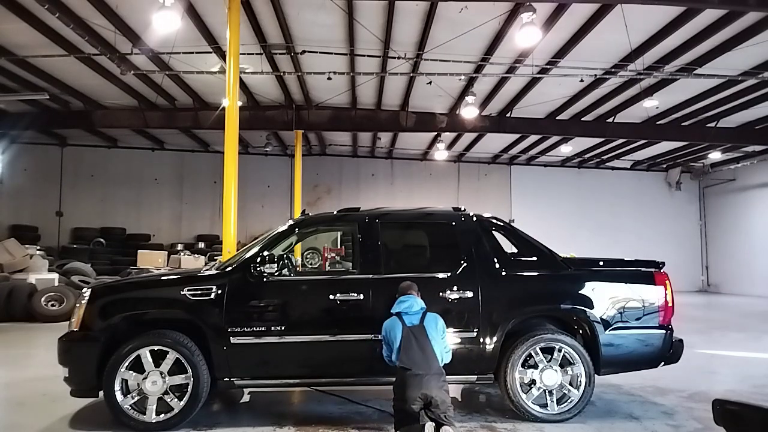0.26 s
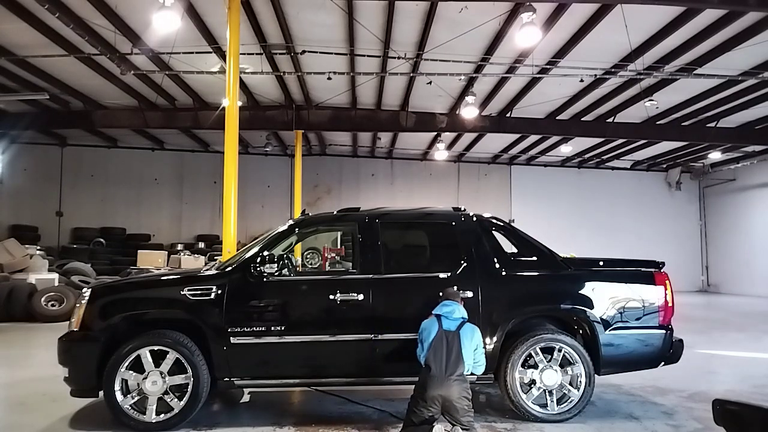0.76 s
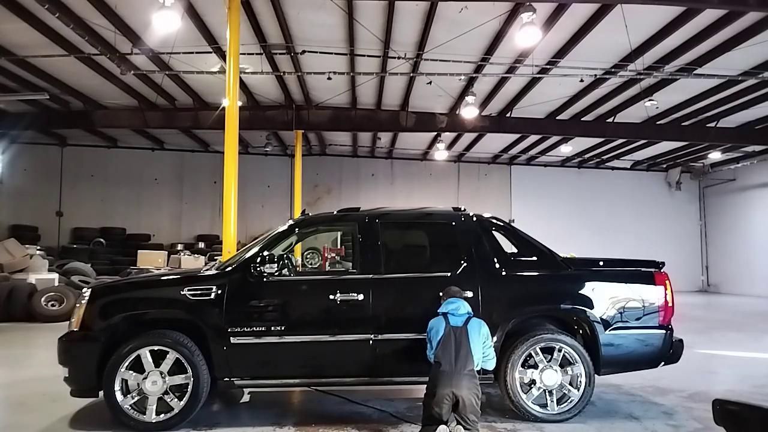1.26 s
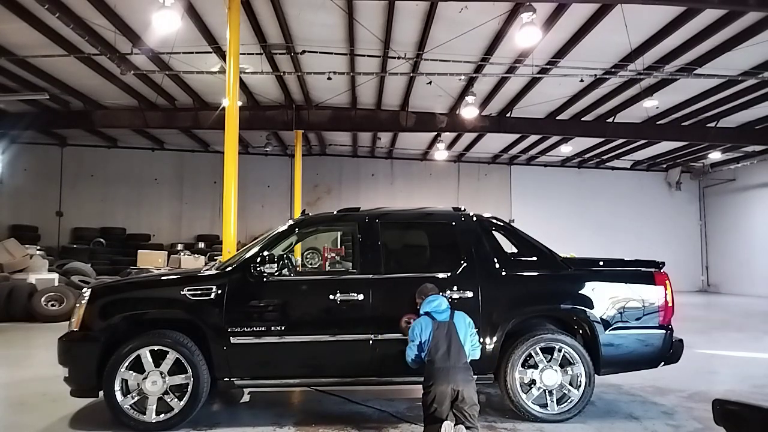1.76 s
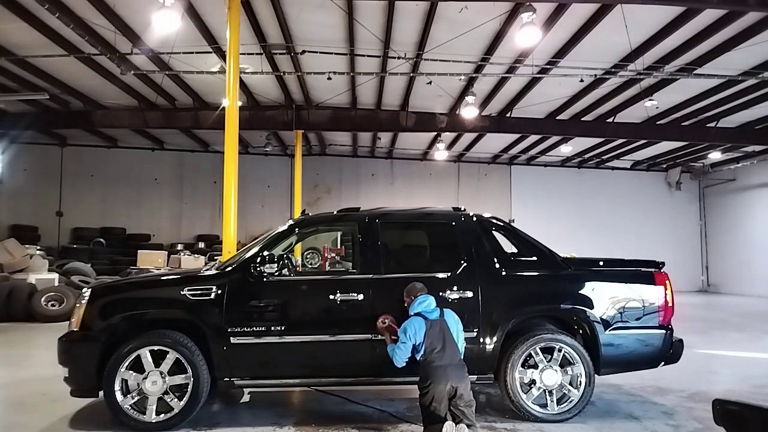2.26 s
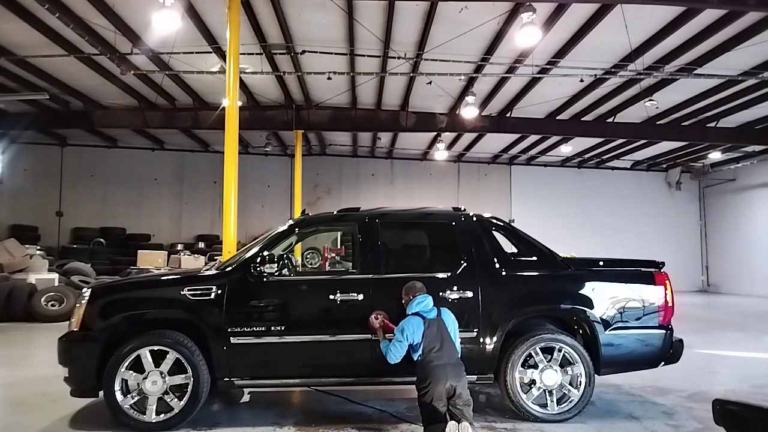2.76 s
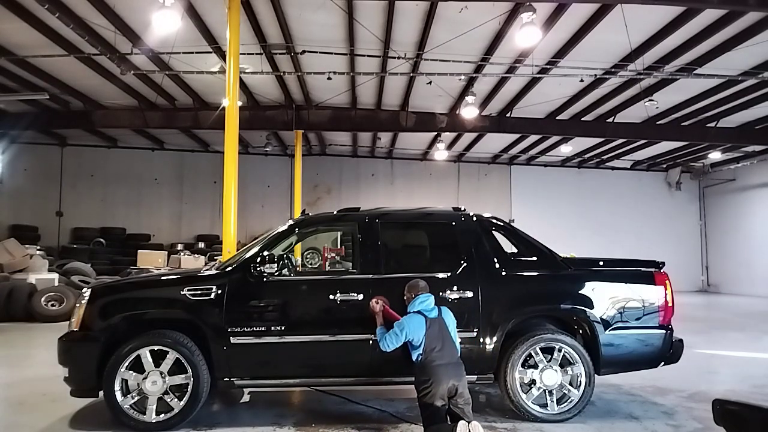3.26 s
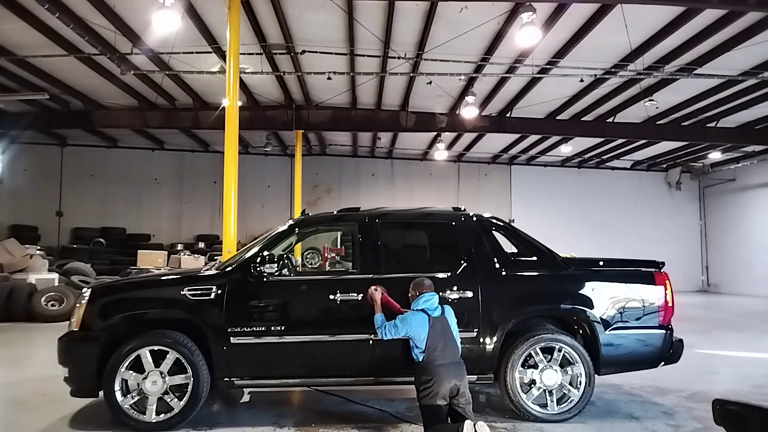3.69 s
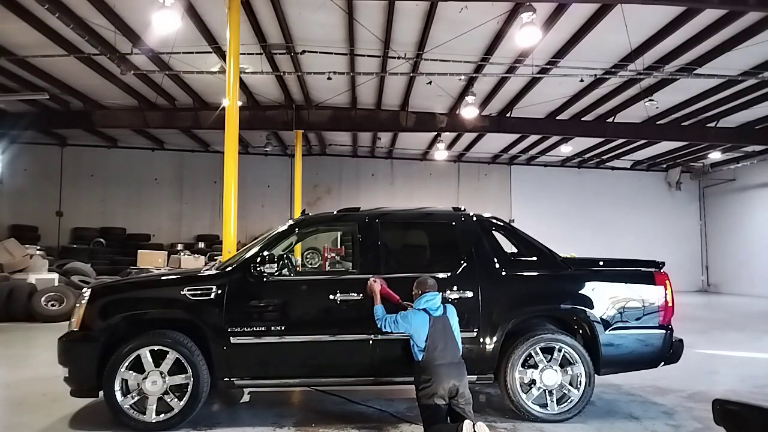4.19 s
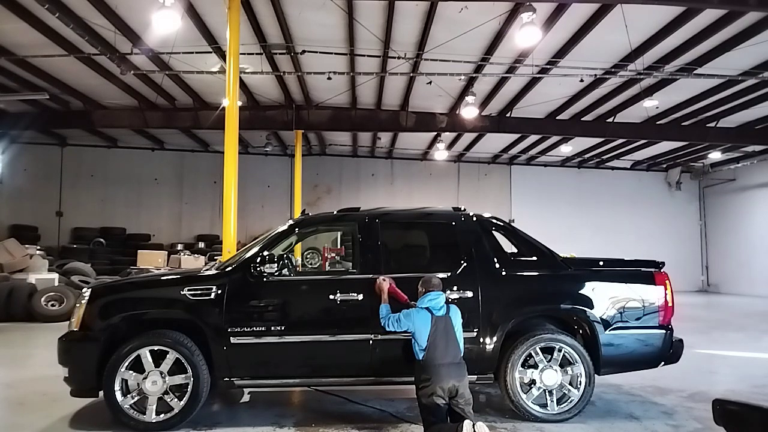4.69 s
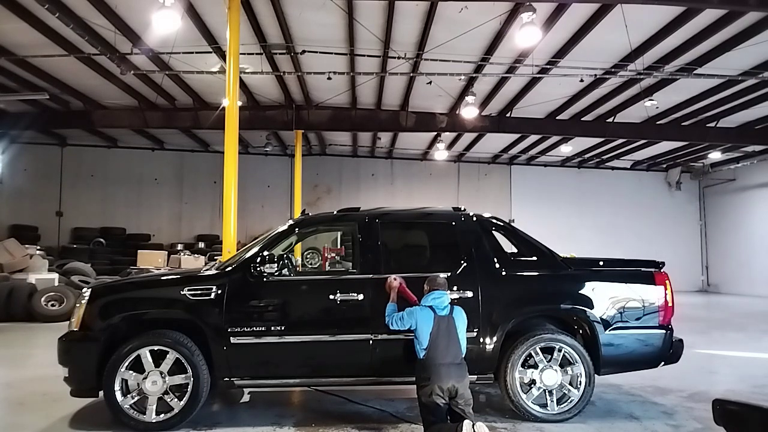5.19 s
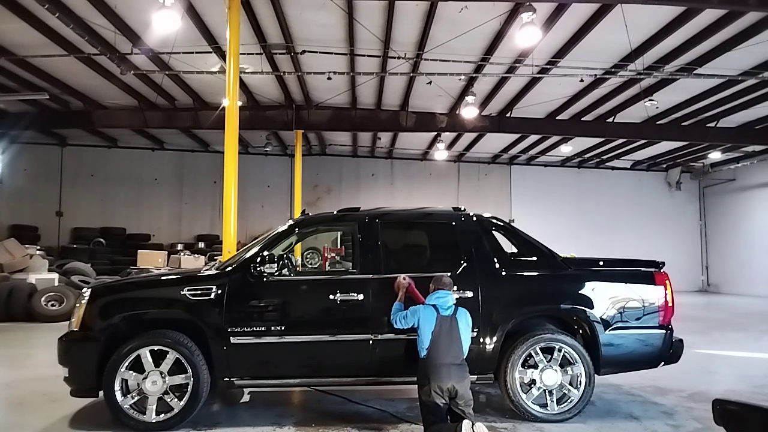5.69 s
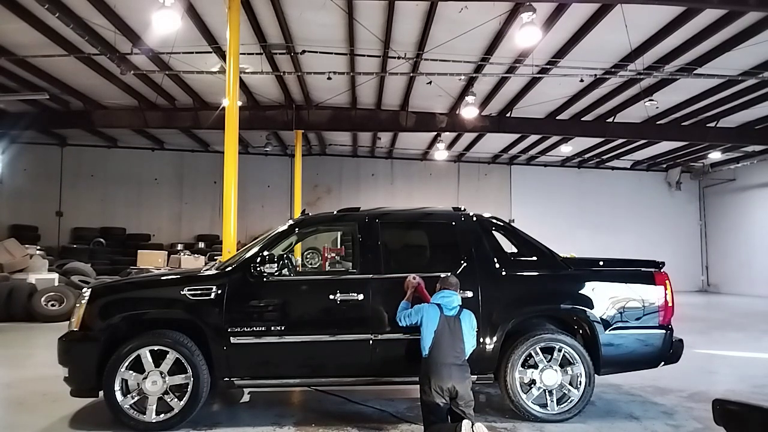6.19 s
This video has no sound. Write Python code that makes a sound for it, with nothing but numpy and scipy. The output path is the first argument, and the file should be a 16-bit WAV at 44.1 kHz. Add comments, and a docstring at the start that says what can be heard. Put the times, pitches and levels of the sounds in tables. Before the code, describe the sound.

An electric polisher whines piercingly and hisses against a car door in a large bare workshop, over a low fluttering hum and roar.

```python
"""An orbital polisher on a car door, some metres off in a large bare workshop, heard by two microphones.
Its motor whines through a seven-tooth pinion and sags when the pad is pressed: sines locked to one shaft angle.
Cooling air and pad hiss are shaped noise pulsed by the mains; the orbit throbs and rubs in the door panel.
A ringing noise tail smears the whine, and a fluttering hum near 100 Hz over a low roar fills the building."""
import sys
import numpy as np
from scipy import signal
from scipy.fft import rfft, irfft
from scipy.io import wavfile
from scipy.ndimage import uniform_filter1d, minimum_filter1d, map_coordinates

SR = 44100
rng = np.random.default_rng(int(sys.argv[2]) if len(sys.argv) > 2 else 0)


def dump_mix(stems):
    """Bounce the given channels to the path in sys.argv[1] as a 16-bit WAV at rate SR."""
    frames = np.atleast_2d(stems).T  # one column per channel
    limited = np.clip(frames, -1, 1)  # hard clip at full scale
    pcm = np.round(limited * 32767).astype(np.int16)
    wavfile.write(sys.argv[1], SR, pcm)


N = 284445
TIME = np.arange(N) / SR
BINS_HZ = np.arange(N // 2 + 1) * SR / N
PINION_TEETH, CROWN_TEETH = 7, 41
MAINS_HZ = 60
HALL_T60_S = 0.7
LEFT_RIGHT = np.array([[1], [-1]])


def undb(db):
    """Decibels to gain."""
    return 10 ** (np.asarray(db) / 20)


def unit(x):
    """Scale to rms 1."""
    return x / np.sqrt(np.mean(x ** 2, axis=-1, keepdims=True))


def curves(table):
    """The columns of a table, joined by straight lines in time."""
    s, *columns = np.transpose(table)
    return np.array([np.interp(TIME, s, c) for c in columns])


def spectra(table):
    """The columns of a table, joined by straight lines over log frequency."""
    hz, *columns = np.transpose(table)
    return np.array([np.interp(np.log(BINS_HZ + 1), np.log(hz), c) for c in columns])


def random_phase():
    """A starting angle anywhere in the cycle."""
    return rng.uniform(0, 2 * np.pi)


def walk(rate, count=4096):
    """Slow chance of spread 1, changing about rate times a second."""
    real, imaginary = rng.standard_normal((2, count))
    spectrum = (real + 1j * imaginary) * np.exp(-(BINS_HZ[:count] / rate) ** 2)
    slow = irfft(spectrum, 4 * count)
    return np.interp(TIME, np.linspace(0, TIME[-1], len(slow)), unit(slow))


# likeness of the two microphones' noise: (f/Hz, correlation)
MICROPHONE_LIKENESS = [(50, 1), (105, 0.95), (200, 0.82), (380, 0.83), (700, 0.56), (1300, 0.068),
                       (2400, 0.55), (4400, 0), (8000, 0)]


def noise(db_per_hz):
    """Stereo noise of a given spectrum; the microphones agree in the bass and part in the treble."""
    alike = spectra(MICROPHONE_LIKENESS)[0]
    mid, side = rfft(rng.standard_normal((2, N)))
    pair = mid * np.sqrt(1 + alike) + LEFT_RIGHT * side * np.sqrt(1 - alike)
    return irfft(pair * undb(db_per_hz) * np.sqrt(SR) / 2, N)


def hall(x, wet_db):
    """Direct sound plus the already ringing hall; a gliding tone swells and fades differently at each microphone."""
    decay = np.exp(-np.log(1000) * TIME / HALL_T60_S)
    tail = unit(rng.standard_normal((2, N)) * decay) / np.sqrt(N)
    wet = undb(wet_db)
    ringing = irfft(rfft(x) * rfft(tail), N)  # wraps round, so the hall rings from the start
    return (x + wet * ringing) / np.sqrt(1 + wet ** 2)


def fading(depth_db=1.3, wander_db=2.8, rate_per_s=9.0):
    """Moving through the hall's standing waves, a tone fades and drifts left to right; mean power 1."""
    sides = undb(LEFT_RIGHT * wander_db * walk(rate_per_s))
    sides = sides / np.sqrt(np.mean(sides ** 2, axis=0))
    return sides * unit(undb(depth_db * walk(rate_per_s)))


def beam(phase, level, lean_db):
    """One loud tone on its level curve, leaning left by lean_db; drive play and the hall stray its phase."""
    at_each_microphone = 0.33 * np.array([walk(18.0), walk(18.0)])
    drive_play = 0.27 * walk(70.0)
    tone = np.sqrt(2) * np.sin(phase + at_each_microphone + drive_play)
    lean = unit(undb(np.array([1, -1]) * lean_db / 2))[:, None]
    return tone * undb(curves(level)[0]) * lean * fading()


# motor under the changing pad pressure: (t/s, shaft f/Hz before jitter)
SHAFT_SPEED = [(0.0, 283.3), (0.23, 284.1), (0.84, 284.0), (1.25, 285.0), (1.42, 280.8), (1.58, 280.4),
               (1.71, 286.1), (1.8, 287.0), (2.3, 282.7), (2.6, 284.9), (3.2, 283.5), (3.36, 286.0),
               (3.56, 285.7), (3.68, 284.3), (4.0, 286.4), (4.26, 284.8), (4.63, 285.4), (4.92, 282.2),
               (5.14, 285.2), (5.75, 285.0), (5.86, 286.3), (6.23, 282.9), (6.45, 284.2)]


def shaft(jitter_hz=0.18, hunt_hz=0.1945, ripple_rad=0.015, orbit_sway_rad=0.073):
    """Angles of motor, pad orbit and mains pulsing; torque ripple and the off-centre pad rock the motor."""
    speed_hz = curves(SHAFT_SPEED)[0] + hunt_hz * walk(5.34) + jitter_hz * walk(28.7)
    angle = 2 * np.pi * np.cumsum(speed_hz) / SR
    orbit = angle * PINION_TEETH / CROWN_TEETH
    mains = 2 * np.pi * 2 * MAINS_HZ * TIME  # the power pulses twice a mains cycle
    rocking = ripple_rad * np.sin(mains) + orbit_sway_rad * np.sin(orbit)  # radians of the mesh tone
    return angle + rocking / PINION_TEETH, orbit, mains


# gear mesh tone as the tool is turned about: (t/s, relative level/dB)
MESH_LEVEL = [(0.0, -36.5), (0.14, -26.5), (0.28, -30.5), (0.34, -22.0), (0.72, -21.5), (0.89, -25),
              (0.95, -37), (1.02, -32), (1.08, -48.5), (1.22, -34.5), (1.48, -37.5), (1.66, -27.0),
              (1.84, -29.5), (1.88, -39.5), (1.98, -33.5), (2.08, -31.0), (2.34, -26.5), (2.5, -28.0),
              (2.6, -18.0), (2.7, -26.0), (2.92, -20.0), (3.08, -22.5), (3.18, -38.0), (3.34, -18.5),
              (3.72, -22.0), (3.82, -29.5), (3.92, -23.0), (4.02, -35.0), (4.32, -25.0), (4.64, -20.5),
              (4.7, -30.5), (4.84, -24.5), (4.88, -27.0), (4.92, -40.0), (5.05, -33), (5.28, -27.5),
              (5.4, -39.5), (5.54, -27.5), (5.76, -37.0), (5.88, -31.5), (6.1, -31), (6.25, -44),
              (6.44, -38.0)]
# its octave, which beams more narrowly: (t/s, relative level/dB)
OCTAVE_LEVEL = [(0.0, -31.0), (0.42, -21.5), (0.5, -35.0), (0.72, -19.5), (0.78, -27.5), (0.96, -27.5),
                (1.16, -39.0), (1.26, -18.5), (1.34, -31.0), (1.6, -23.0), (1.66, -28.5), (2.06, -31.5),
                (2.1, -23.0), (2.24, -36.0), (2.32, -25.0), (2.42, -23.0), (2.46, -34.5), (2.64, -17.5),
                (2.78, -28.5), (2.84, -23.5), (3.06, -29.5), (3.12, -22.5), (3.32, -19.0), (3.6, -21.5),
                (3.66, -30.5), (3.92, -18.0), (4.06, -33.0), (4.5, -28.5), (4.68, -32.5), (4.8, -19.0),
                (5.0, -36.5), (5.26, -28.0), (5.38, -36.5), (5.5, -24.5), (5.68, -39.5), (5.8, -25.5),
                (5.92, -27.5), (5.96, -33.0), (6.12, -29.0), (6.22, -34.5), (6.4, -28.5), (6.44, -34.5)]
# third tone of the gear mesh: (t/s, relative level/dB)
THIRD_LEVEL = [(0.0, -37.0), (0.4, -35.0), (0.5, -46), (0.64, -40.5), (0.92, -34.0), (1.0, -48.5),
               (1.1, -48), (1.24, -34.5), (1.42, -43.0), (1.5, -34.0), (1.58, -44.5), (1.88, -36.5),
               (2.06, -45.5), (2.12, -34.5), (2.26, -38.5), (2.32, -29.0), (2.38, -35.5), (2.72, -29.5),
               (2.88, -42.5), (3.04, -35.5), (3.58, -41.0), (3.82, -34.0), (4.1, -45.0), (4.3, -46),
               (4.5, -32.5), (4.68, -41.0), (4.82, -34.5), (5.06, -50.5), (5.19, -31), (5.32, -31.5),
               (5.4, -43), (5.5, -33.5), (5.72, -44.5), (5.84, -32.5), (5.9, -47.5), (6.44, -37.0)]


def gears(angle, load, mesh_db=-0.46, octave_db=0.2, orbit_db=-17.0, flutter_db=-27.0):
    """The teeth meet seven times a turn: a piercing tone and two overtones, harder with each pulse of load."""
    mesh = PINION_TEETH * angle + np.array([[0], [.8]])  # the tones reach the microphones out of step
    orbit = angle * PINION_TEETH / CROWN_TEETH
    # the off-centre pad loads the crown wheel once an orbit: a firm side tone below, a fluttering one above
    strands = [(0, 1), (-orbit, undb(orbit_db)), (orbit, undb(flutter_db) * walk(8.5))]
    fundamental = sum(share * beam(mesh + offset, MESH_LEVEL, lean_db=-3.5) for offset, share in strands)
    octave = beam(2 * mesh, OCTAVE_LEVEL, lean_db=1.3)
    third = beam(3 * mesh, THIRD_LEVEL, lean_db=-4.5)
    tones = undb(mesh_db) * fundamental + undb(octave_db) * octave + third
    return hall(tones * load, wet_db=-15)


# commutator tone, 12 times the shaft rate: (t/s, relative level/dB)
COMMUTATOR_LEVEL = [(0.0, -27), (0.191, -31), (0.55, -30), (0.73, -33), (0.89, -27), (1.0, -41),
                    (1.17, -38), (1.28, -25.5), (1.38, -39), (1.76, -30), (1.82, -24.5), (2.01, -41),
                    (2.57, -23), (2.78, -30), (2.88, -24), (3.48, -27.5), (3.55, -32), (3.64, -20.5),
                    (3.89, -26), (4.02, -36), (4.31, -25.5), (4.72, -34), (4.86, -28), (5.06, -35),
                    (5.6, -52), (5.8, -29), (5.96, -56), (6.09, -20), (6.24, -40), (6.44, -33)]
# its neighbour, 13 times the shaft rate: (t/s, relative level/dB)
NEIGHBOUR_LEVEL = [(0.0, -27), (0.9, -27), (1.1, -42), (1.7, -36), (1.87, -31), (2.0, -34), (2.73, -24),
                   (3.05, -30), (3.5, -20), (3.62, -35), (3.8, -26), (4.1, -46), (4.4, -32), (4.55, -15),
                   (4.7, -37), (6.45, -56)]
# thin whine, 17 times the shaft rate: (t/s, relative level/dB)
THIN_LEVEL = [(0.0, -32), (0.09, -24), (0.6, -54), (0.9, -31), (1.0, -34), (2.44, -42), (2.54, -27),
              (2.63, -26), (2.85, -33), (2.89, -43), (3.04, -22), (3.16, -37), (3.22, -25), (3.39, -36),
              (3.48, -33), (3.75, -30), (4.05, -55), (6.44, -54)]
# lower tone of the bright whirr, 29 times the shaft rate: (t/s, relative level/dB)
LOW_WHIRR_LEVEL = [(0.0, -43.5), (0.18, -37.0), (0.4, -43.5), (0.78, -31.0), (1.02, -41.0), (1.06, -55.0),
                   (1.22, -36.5), (1.48, -43.0), (1.74, -35.5), (1.9, -44.0), (1.94, -35.0), (2.12, -44.0),
                   (2.34, -24.5), (2.44, -33.0), (2.5, -28.0), (2.56, -36.0), (2.88, -33.0), (3.14, -40.0),
                   (3.38, -28.5), (3.62, -43.0), (3.8, -34.5), (4.08, -30.0), (4.12, -39.5), (4.2, -30.5),
                   (4.38, -35.0), (4.48, -29.0), (4.74, -36.5), (4.88, -24.0), (4.96, -42.5), (5.24, -27.0),
                   (5.36, -29.5), (5.4, -45.0), (5.52, -28.5), (5.74, -40.0), (5.78, -28.0), (5.9, -26.5),
                   (6.0, -38.0), (6.44, -40.0)]
# its upper tone, 31 times the shaft rate: (t/s, relative level/dB)
HIGH_WHIRR_LEVEL = [(0.0, -45.5), (0.22, -35.0), (0.42, -42.0), (0.94, -38.5), (1.14, -57.0), (1.2, -35.5),
                    (1.3, -49.0), (1.6, -38.0), (1.72, -47.0), (1.76, -38.0), (2.02, -43.5), (2.1, -28.5),
                    (2.24, -50.0), (2.28, -38.0), (2.38, -34.5), (2.44, -43.0), (2.56, -33.0),
                    (2.66, -40.0), (2.78, -31.5), (3.22, -35.5), (3.72, -34.0), (3.94, -28.0),
                    (4.02, -37.0), (4.42, -32.0), (5.08, -44.0), (5.2, -25.5), (5.34, -34.5), (5.58, -26.0),
                    (5.74, -36.0), (5.88, -31.0), (5.98, -37.5), (6.44, -37.0)]


def whine(angle, load, neighbour_db=-8.0, thin_db=-3.0, whirr_db=1.0):
    """The loudest motor tones, each beamed its own way, flash up in turn as the tool is moved about."""
    angle = angle + np.array([[0], [.08]])  # out of step at the two microphones
    commutator = beam(12 * angle, COMMUTATOR_LEVEL, 1)
    neighbour = beam(13 * angle, NEIGHBOUR_LEVEL, 0)
    thin = beam(17 * angle, THIN_LEVEL, -2)
    whirr = beam(29 * angle, LOW_WHIRR_LEVEL, 14) + beam(31 * angle, HIGH_WHIRR_LEVEL, 16)
    tones = commutator + undb(neighbour_db) * neighbour + undb(thin_db) * thin + undb(whirr_db) * whirr
    return hall(tones * load, wet_db=-7)


# fan tone, 9 times the shaft rate: (t/s, relative level/dB)
FAN_LEVEL = [(0, -44), (.12, -31), (.28, -22), (.42, -41), (.55, -31), (.76, -27.5), (1.05, -47),
             (1.55, -33), (2.2, -42), (2.5, -42), (3.1, -39), (3.5, -26.5), (3.7, -37), (3.9, -29),
             (4.2, -28.5), (4.4, -51), (4.7, -33), (5, -40), (5.3, -34), (5.8, -27), (6.1, -33),
             (6.45, -35)]
# tone just above it, 10 times the shaft rate: (t/s, relative level/dB)
TENTH_LEVEL = [(0, -45), (.5, -50), (.64, -33), (.85, -50), (2.2, -44), (2.33, -25), (2.48, -33),
               (2.6, -47), (3.25, -38), (3.37, -27), (3.52, -27), (3.65, -43), (4.65, -42), (4.83, -26),
               (5.05, -37), (6.1, -31), (6.22, -37), (6.45, -29)]
# side tone just above the gear mesh: (t/s, relative level/dB)
BEAT_LEVEL = [(0, -37), (.9, -39), (1.1, -42), (3.45, -48), (3.6, -25), (3.9, -39), (4.15, -37), (4.5, -24),
              (4.75, -30), (4.95, -40), (6.45, -33)]
# side tone below the commutator tone: (t/s, relative level/dB)
UNDERTONE_LEVEL = [(0, -40), (.7, -43), (1.1, -37), (2, -38), (2.3, -24), (2.6, -47), (2.95, -36),
                   (3.2, -40), (3.45, -29), (3.62, -46), (3.8, -32), (4.1, -41), (4.5, -38), (4.9, -31),
                   (5.3, -31), (6.1, -36), (6.45, -41)]
# side tone above the octave: (t/s, relative level/dB)
OVERTONE_LEVEL = [(0, -24), (.4, -38), (.65, -25), (1.0, -47), (1.35, -45), (1.8, -42), (2.4, -44),
                  (3.5, -42), (4.5, -45), (5.0, -32), (6, -43), (6.45, -35)]
# fine whistle, 23 times the shaft rate: (t/s, relative level/dB)
WHISTLE_LEVEL = [(0, -41), (1.3, -51), (2.2, -50), (2.33, -33), (2.55, -43), (2.73, -28), (2.9, -47),
                 (3.02, -29), (3.2, -47), (3.65, -34), (3.92, -32), (4.1, -41), (6.45, -49)]


def cluster(angle, mains, load):
    """Weaker tones crowd the loud ones: fan and shaft tones, and side tones set off by the mains pulsing."""
    angle = angle + np.array([[0], [.08]])  # out of step at the two microphones
    fan = beam(9 * angle, FAN_LEVEL, 0) + beam(10 * angle, TENTH_LEVEL, 2)
    beat = beam(8 * angle - mains, BEAT_LEVEL, -4)
    undertone = beam(12 * angle - mains, UNDERTONE_LEVEL, -4)
    overtone = beam(14 * angle + mains, OVERTONE_LEVEL, 2)
    whistle = beam(23 * angle, WHISTLE_LEVEL, -7)
    return hall((fan + beat + undertone + overtone + whistle) * load, wet_db=-5)


# other tones of shaft, commutator and fan:
# (multiple of the shaft f, mains sideband -1/0/1, left relative level/dB, right relative level/dB)
MOTOR_TONES = [(2, 0, -44, -47), (6, 0, -48, -48), (7, -1, -50, -44), (7, 1, -37, -36), (9, -1, -45, -40),
               (9, 1, -47, -43), (11, -1, -42, -40), (11, 0, -42, -44), (12, 1, -40.5, -42),
               (14, -1, -42, -42), (16, -1, -47, -47), (16, 0, -44, -42), (18, 0, -40, -44),
               (19, 0, -45, -46), (24, 0, -53, -45), (25, 0, -52, -52), (27, 0, -43, -51),
               (28, 0, -42, -52), (29, 1, -44, -56), (30, 0, -38, -54), (31, -1, -45, -58),
               (32, 0, -42, -56), (33, 0, -42, -56), (35, 0, -45, -53)]
# swell of the fainter middle motor tones: (t/s, relative level/dB)
MIDDLE_LEVEL = [(0.0, -2), (0.2, 1), (0.55, -6), (0.9, 0), (1.05, -30), (1.55, -0.5), (2.0, -1.5),
                (3.1, -1), (3.6, 0.5), (3.9, 5.5), (4.1, -4), (4.6, 4.5), (5.0, -1), (6.45, -4)]


def motor(angle, mains, load, waver_db=2.5, top_db=-3.0, top_waver_db=3.5, whirr_share=0.4,
          side_db=-23.0, top_order=26):
    """Fainter wavering shaft tones with side tones from the pulsing current; the top swells with the whirr."""
    middle = curves(MIDDLE_LEVEL)[0], waver_db
    whirr = (curves(LOW_WHIRR_LEVEL)[0] + curves(HIGH_WHIRR_LEVEL)[0]) / 2
    top = whirr_share * (whirr - whirr.mean()) + top_db, top_waver_db
    out = np.zeros((2, N))
    for k, sideband, *left_right_db in MOTOR_TONES:
        swell_db, depth_db = top if k > top_order else middle
        phase = k * angle + sideband * mains + random_phase()
        side_phase = phase + rng.choice([-1, 1]) * mains + random_phase()
        tone = np.sin(phase) + undb(side_db) * np.sin(side_phase)
        out += undb(left_right_db)[:, None] * tone * undb(swell_db + depth_db * walk(13.0))
    return hall(np.sqrt(2) * out * load, wet_db=-4)


# cooling air and pad hiss: (f/Hz, left relative level/dB per Hz, right relative level/dB per Hz)
AIR = [(300, -82, -82), (1000, -63, -63.5), (1550, -64, -63), (1850, -59.3, -57.8), (2150, -54.5, -53),
       (2500, -56.5, -55), (3000, -57.3, -57), (4200, -58.8, -59.2), (5300, -65.3, -66.5),
       (6500, -70.5, -66.5), (7350, -72, -73.5), (8500, -63.5, -74.5), (9700, -71.5, -78),
       (11000, -76, -79), (12900, -84, -84), (13700, -75, -74), (15400, -86, -85)]
# how openly pad and vents face the microphones:
# (t/s, rush of air relative level/dB, upper hiss relative level/dB, top hiss relative level/dB)
FACING = [(0.0, 0.1, 2.5, 5), (0.75, -0.7, 4.5, 3.5), (0.93, -1, 3.5, 7.5), (0.99, -4, -2.5, -3),
          (2.4, 0, -1, 1.5), (2.55, -1.5, 0.5, 2.5), (2.95, 0, -0.5, 3), (3.05, 0, 1, 2),
          (3.95, -0.2, 0, 5.5), (4.1, 2, -2.5, 3.5), (4.25, -0.5, -0.5, 5.5), (4.7, 0.5, -1, 4.5),
          (6.45, 0.5, -2.5, 1)]


def shimmer(angle, orbit, mains, over_hiss_db=10.0, fade_db=7.0, fade_per_s=7.0):
    """Faint side tones of every shaft tone, from mains and orbit, stand just over the hiss and come and go."""
    hz, *left_right_db = np.transpose(AIR)
    shaft_hz = np.mean(curves(SHAFT_SPEED))
    out = np.zeros((2, N))
    for k in range(7, 34):  # multiples of the shaft rate
        hiss_db = np.array([[np.interp(k * shaft_hz, hz, db)] for db in left_right_db])
        for side in (-mains, mains, rng.choice([-1, 1]) * orbit):
            phase = k * angle + side + 0.9 * walk(12.0) + random_phase()
            swell = unit(undb(fade_db * np.tanh(walk(fade_per_s))))
            tone = np.sin(phase + rng.standard_normal((2, 1)))
            out += undb(hiss_db + over_hiss_db) * swell * tone
    return np.sqrt(2) * out * undb(curves(FACING)[0])


def grain(x, orbit, repeat=0.31):
    """The pad crosses the same spots every orbit, so part of its hiss returns as fine wavering strands."""
    out = np.zeros_like(x)
    for k in range(4):
        orbits_ago = np.searchsorted(orbit, orbit - 2 * np.pi * k)
        out += repeat ** k * x[:, orbits_ago]
    return out * np.sqrt(1 - repeat ** 2)


def scrub(x, depth_db=2.2, patch_hz=260, patch_s=0.022, size=256):
    """The foam catches and slips in small patches, so each narrow band of its hiss flickers on its own."""
    hz, s, frames = signal.stft(x, SR, nperseg=size)
    chance = rng.standard_normal((int(hz[-1] / patch_hz) + 2, int(s[-1] / patch_s) + 2))
    places = np.meshgrid(hz / patch_hz, s / patch_s, indexing="ij")
    gain = undb(depth_db * map_coordinates(chance, places, mode="mirror"))
    flickering = frames * gain / np.sqrt(np.mean(gain ** 2))
    return signal.istft(flickering, SR, nperseg=size)[1][:, :N]


def air(angle, orbit, mains, buzz=0.11, swish=0.066, chop=0.075, grip_db=0.5, grip_per_s=17.0):
    """Fan air, brushes and pad rub, pulsed by mains, orbit and shaft; the worker's body shades the treble."""
    blades = np.cos(angle) + 0.31 * np.cos(2 * angle)
    pulsing = 1 + buzz * np.cos(mains) + swish * np.cos(orbit) + chop * blades
    grip = undb(grip_db * walk(grip_per_s))  # the pad grips the paint unevenly
    hiss = scrub(grain(noise(spectra(AIR)), orbit))
    flow = rfft(hiss * pulsing * grip)
    # f/Hz, then the shares of rush, upper hiss and top hiss
    shares = spectra([(3200, 1, 0, 0), (4500, 0, 1, 0), (7000, 0, 1, 0), (8200, 0, 0, 1)])
    levels_db = curves(FACING) + np.array([[-0.3], [0.44], [-1.05]])
    return sum(irfft(flow * share, N) * undb(db) for share, db in zip(shares, levels_db))


# door panel shaken by the pad: (t/s, level/dB)
THROB_LEVEL = [(0.0, -23), (0.8, -33), (1.3, -28), (1.6, -35), (2.2, -32), (2.5, -27), (3.3, -26),
               (3.5, -29), (4.25, -18.5), (4.45, -26), (4.69, -16), (4.82, -47), (5.1, -27), (5.6, -21),
               (5.9, -31), (6.45, -24)]
# hollow tone of the rubbed door as the pad climbs it: (t/s, centre f/Hz)
PANEL_TONE = [(0, 675.8), (1.0, 795.4), (2.5, 733.5), (4.0, 646.3), (5.2, 587), (6.45, 562)]


def door(orbit, mains, drone_db=-38.0, rub_db=-35.5, rub_width_hz=120):
    """The pad pumps the panel once an orbit and rubs a hollow tone from it; the mains drone comes through."""
    throb = undb(curves(THROB_LEVEL)[0]) * np.sin(orbit + 0.99 * walk(5.0))
    # four times the mains frequency
    drone = undb(drone_db + 0.84 * walk(3.0)) * np.sin(2 * mains + 0.57 * walk(6.2))
    ring = 2 * np.pi * np.cumsum(curves(PANEL_TONE)[0]) / SR
    rub = walk(rub_width_hz) * np.sin(ring) + walk(rub_width_hz) * np.cos(ring)  # a narrow band of noise
    return throb + drone + hall(undb(rub_db) * rub, wet_db=-2.0)


# hum of the building, peaked by its low resonances: (f/Hz, relative level/dB)
HUM_SPECTRUM = [(40, -104), (66, -47), (78, -16.5), (86, 10), (91, -23), (97, 5.5), (101, 2.5), (107, 4),
                (117, -4), (129, 3), (143, -2.5), (160, -31), (300, -140)]
# slow level of the hum: (t/s, relative level/dB)
HUM_LEVEL = [(0.0, -18), (1.0, -20.5), (2.4, -17.5), (2.75, -20), (3.0, -23.5), (3.3, -18), (3.8, -18.5),
             (4.05, -21), (5.15, -17), (5.6, -21.5), (6.45, -18)]
# rounded surges of the hum: (middle t/s, length scale t/s, relative peak level/dB, f/Hz)
HUM_SURGES = [(0.18, 0.088, -16, 102.1), (0.309, 0.028, -12, 110), (0.533, 0.045, -12.5, 106),
              (0.626, 0.065, -10, 105), (0.781, 0.044, -11.5, 93), (0.848, 0.056, -11, 104.7),
              (1.01, 0.05, -11.0, 108.8), (1.084, 0.023, -13, 110), (1.186, 0.022, -12, 106),
              (1.385, 0.038, -9.0, 103.9), (1.473, 0.045, -11, 101.3), (1.586, 0.016, -10, 103.8),
              (1.637, 0.053, -11.5, 99.7), (1.743, 0.052, -11, 99), (1.806, 0.024, -9, 102),
              (2, 0.045, -11, 102), (2.1, 0.054, -15, 100), (2.172, 0.034, -13, 94.5),
              (2.27, 0.056, -9, 100.8), (2.455, 0.046, -10.5, 108.7), (2.553, 0.06, -10.5, 105.3),
              (2.859, 0.065, -11, 103), (3.108, 0.024, -10, 107), (3.155, 0.045, -14, 102),
              (3.255, 0.025, -13, 108), (3.735, 0.041, -14, 102.6), (3.829, 0.065, -13, 101.5),
              (4.22, 0.038, -9, 101), (4.28, 0.023, -9, 105), (4.608, 0.03, -10, 103.5),
              (4.966, 0.031, -11, 105.6), (5.1, 0.092, -14, 106.2), (5.18, 0.019, -12, 98.4),
              (5.233, 0.022, -13.5, 112), (5.332, 0.042, -13, 101.2), (5.805, 0.033, -15.5, 100),
              (5.902, 0.039, -13.5, 112), (6.044, 0.05, -14, 109.6), (6.158, 0.05, -14.5, 102),
              (6.369, 0.02, -9.5, 108)]
# broad roar that goes with the hum: (f/Hz, relative level/dB per Hz)
ROAR_SPECTRUM = [(22, -72), (32, -74), (39, -43), (43, -63), (56, -42.5), (70, -44), (165, -50),
                 (185, -45.5), (240, -45.5), (295, -57), (370, -51.5), (450, -56), (505, -60), (610, -56),
                 (800, -62), (1100, -65), (2000, -70.5), (4000, -130)]


def workshop(hum_db=1.0, surge_db=-0.45, roar_db=0.8, evenness=0.89, steady_s=0.19,
             sharpness=1.9, lull_reach=0.67):
    """A fluttering hum near 100 Hz gathers into rounded surges amid lulls, over a roar like a big blower."""
    hum = unit(noise(spectra(HUM_SPECTRUM)))
    power = uniform_filter1d(np.mean(hum ** 2, axis=0), int(steady_s * SR))
    hum = unit(hum / power ** (evenness / 2))  # flutters quickly but holds its level over longer spans
    hum = hum * undb(curves(HUM_LEVEL)[0] + hum_db)
    surges = np.zeros(N)
    for middle, length, db, hz in HUM_SURGES:
        near = np.abs(TIME - middle) < 3 * length
        away = (TIME[near] - middle) / length
        tone = np.sqrt(2) * np.sin(2 * np.pi * hz * TIME[near] + random_phase())
        surges[near] += undb(db + surge_db) * np.exp(-sharpness * away ** 2) * tone
        hum[:, near] *= 1 - 0.6 * np.exp(-(away / lull_reach) ** 2)  # the random hum makes way
    lean_db = np.array([[-.7], [.7]])  # it stands a little to the right
    return (hum + surges) * undb(lean_db) + noise(spectra(ROAR_SPECTRUM) + roar_db)


def scene():
    """The polisher and the workshop around it."""
    angle, orbit, mains = shaft()
    # force on teeth and bearings
    load = unit(1 + 0.06 * np.cos(mains) + 0.04 * np.cos(orbit) + 0.17 * walk(44))
    tones = gears(angle, load) + whine(angle, load) + cluster(angle, mains, load) + motor(angle, mains, load)
    polisher = tones + shimmer(angle, orbit, mains) + air(angle, orbit, mains)
    return polisher + door(orbit, mains) + workshop()


def record(dry, ceiling=0.87, hold_s=0.01, top_hz=15850):
    """The recorder eases its gain around the highest peaks and cuts the top."""
    hold = int(hold_s * SR)
    gain = ceiling / np.maximum(np.abs(dry).max(axis=0), ceiling)
    held = dry * uniform_filter1d(minimum_filter1d(gain, hold), hold)
    top_cut = np.clip((top_hz - BINS_HZ) / 100, 0, 1)  # falls to nothing over the last 100 Hz
    return irfft(rfft(held) * top_cut, N)


dry = scene()
out = record(dry)
dump_mix(out)
```